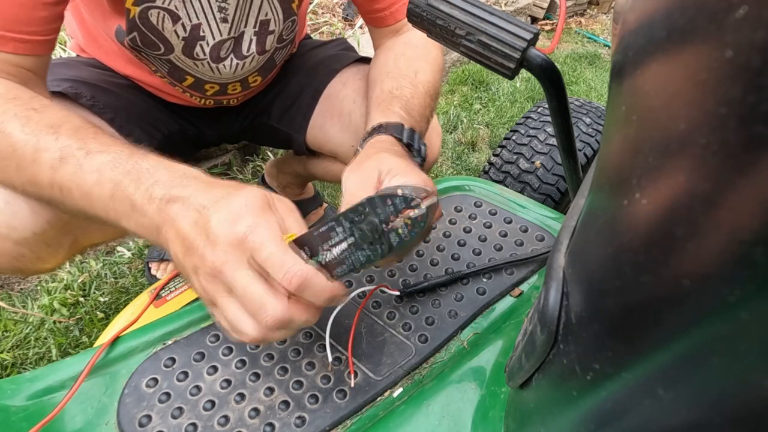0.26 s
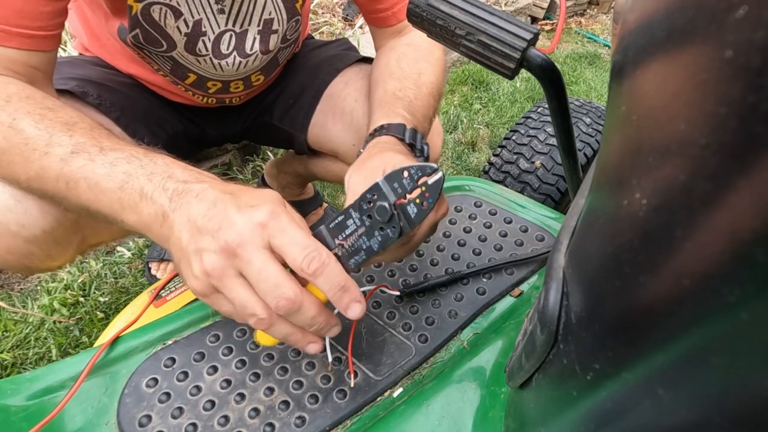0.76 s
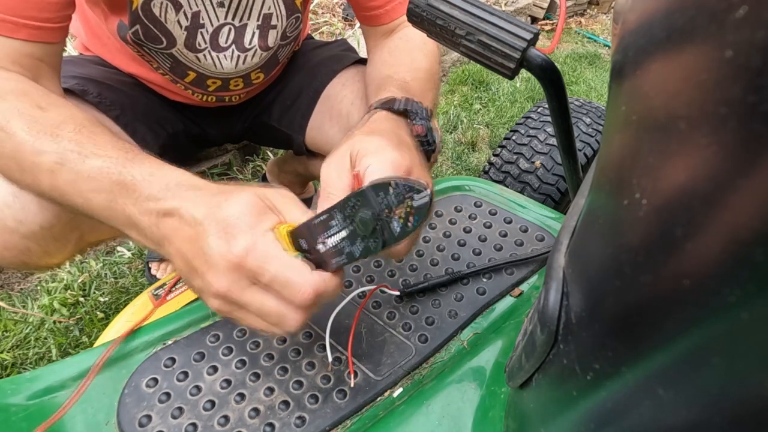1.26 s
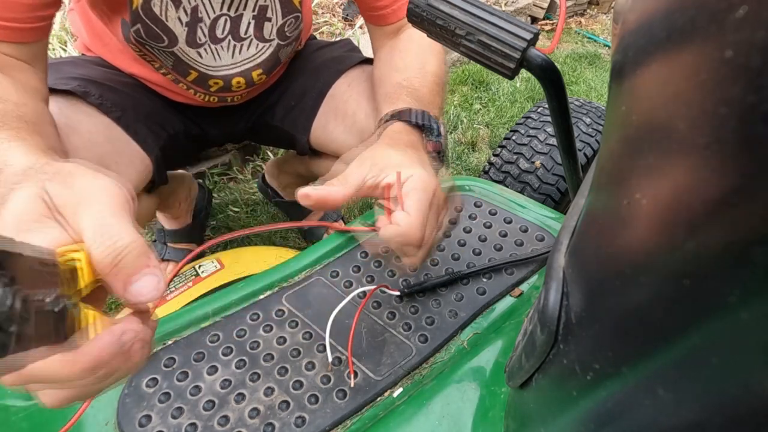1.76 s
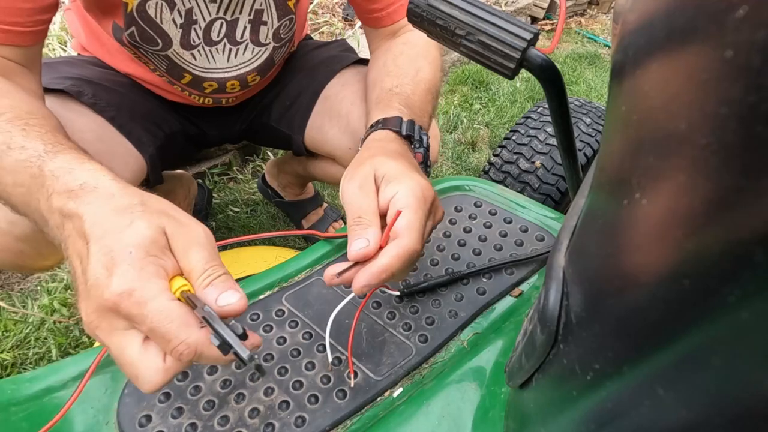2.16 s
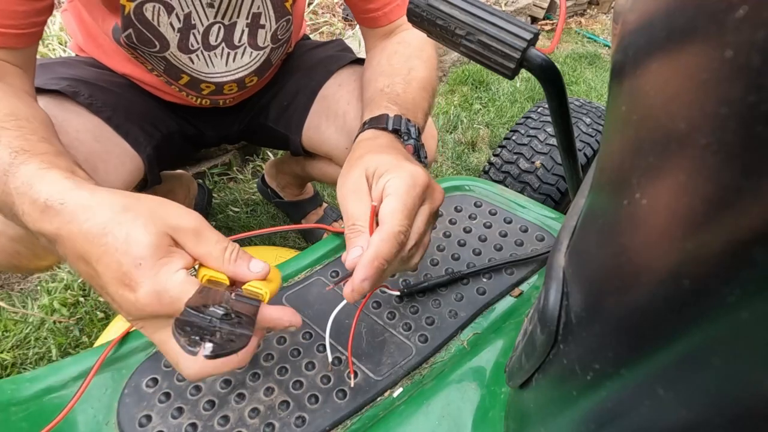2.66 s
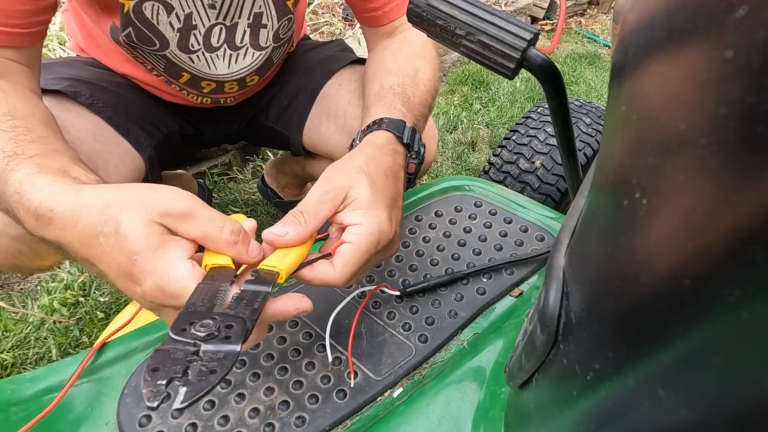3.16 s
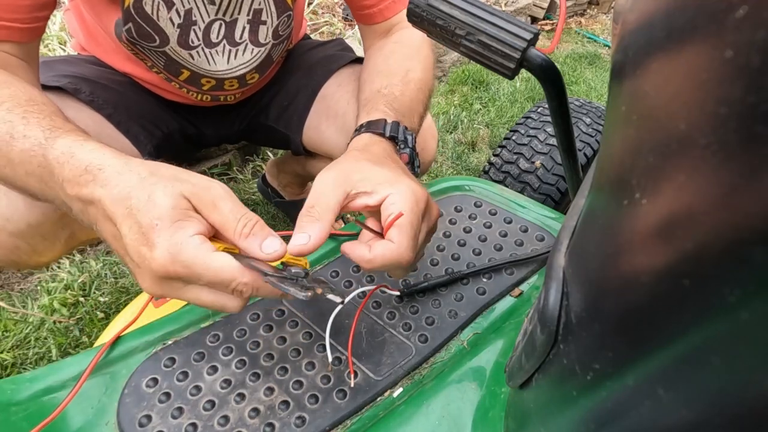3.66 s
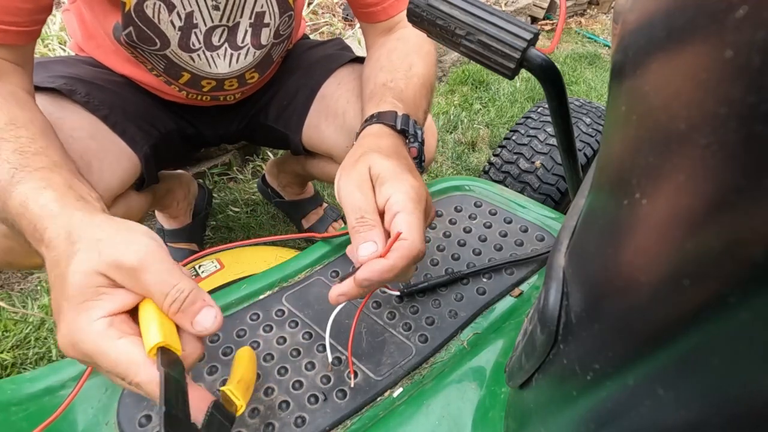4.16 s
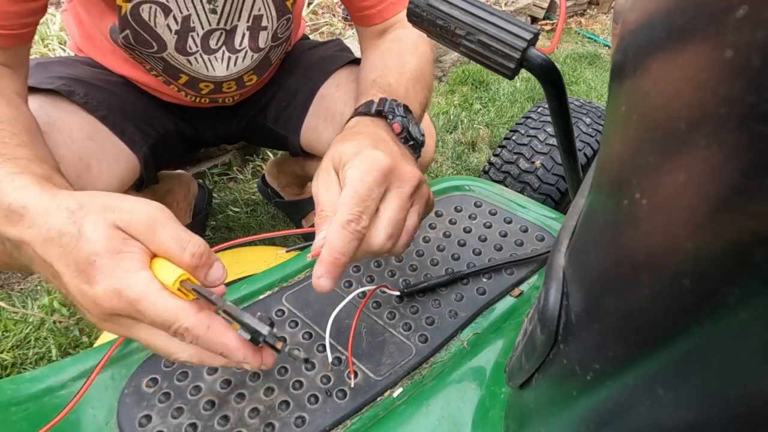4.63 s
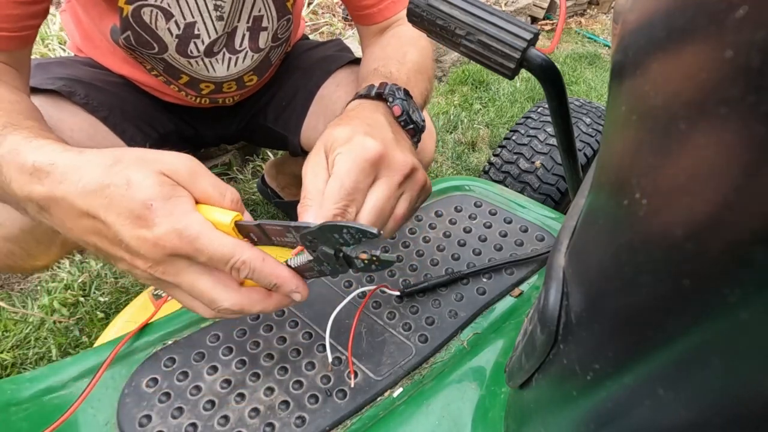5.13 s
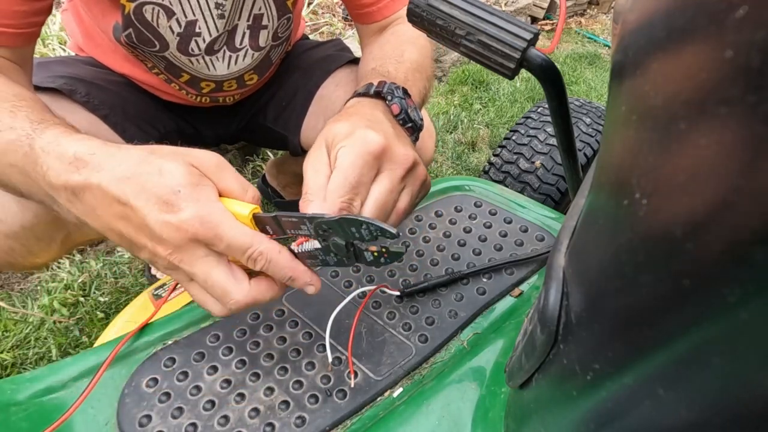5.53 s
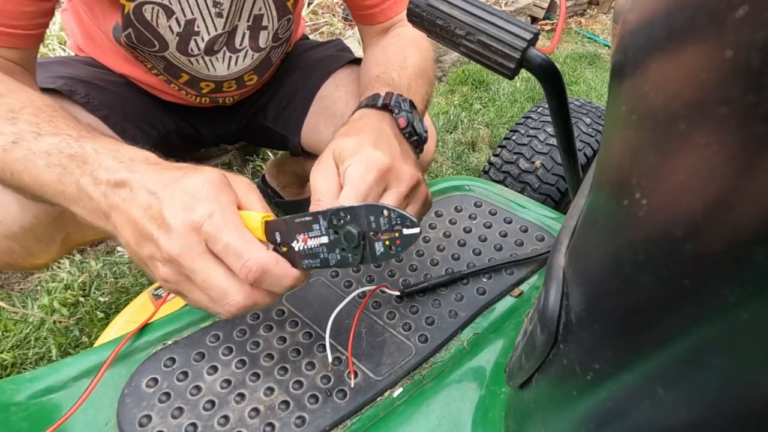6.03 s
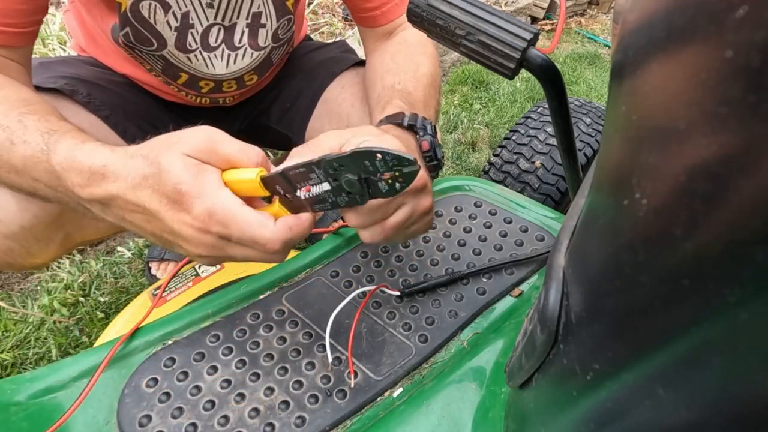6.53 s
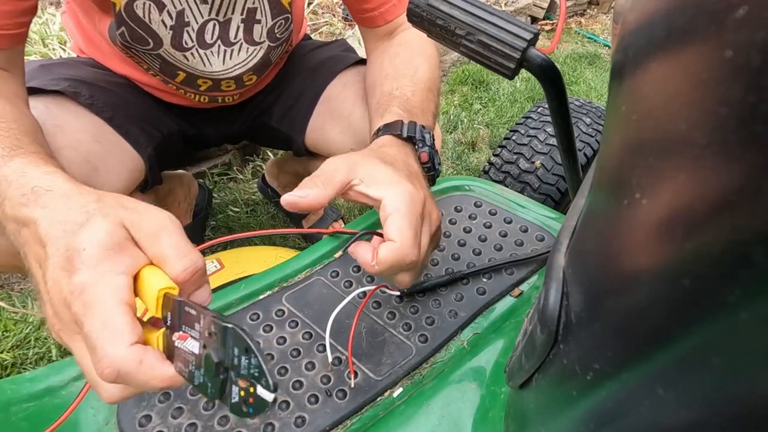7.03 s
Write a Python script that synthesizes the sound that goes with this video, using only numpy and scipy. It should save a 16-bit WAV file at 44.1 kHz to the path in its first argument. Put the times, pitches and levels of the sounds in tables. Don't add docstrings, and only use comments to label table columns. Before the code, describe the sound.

Close to the microphone, steel hand strippers click lightly, then snap hard in a quick cluster with short dry rings, brief scrapes and hollow knocks on a plastic deck. A middle stretch is mostly wind bumps and puffs, then two strong deck thuds, and finally a run of ticks and snaps. Behind, a low engine drone slowly climbs over traffic wash, with occasional faint bird whistles.

```python
import sys
import numpy as np
from scipy import signal
from scipy.fft import rfft, irfft
from scipy.io import wavfile
from scipy.ndimage import uniform_filter1d

SR = 44100
rng = np.random.default_rng(int(sys.argv[2]) if len(sys.argv) > 2 else 0)


def invert_db(level):
    return 10 ** (np.asarray(level, dtype=float) / 20)


def transcribe(signal):
    frames = np.atleast_2d(signal).T
    limited = np.clip(frames, -1, 1)
    pcm = np.round(limited * 32767).astype(np.int16)
    wavfile.write(sys.argv[1], SR, pcm)


N = 321489

# frequency in Hz, level in dB per Hz.
WASH_SPECTRUM = [(59, -29), (100, 2.5), (119, -17), (153, -20), (189, -16), (239, -27.5), (335, -34),
                 (433, -41), (721, -38), (854, -40.5), (930, -36), (2130, -47.5), (2580, -47), (6560, -53),
                 (7900, -59.5), (8300, -62.5), (12500, -72.5), (13600, -78.5), (15700, -84), (15900, -105)]
WASH_DB = -47.5
# centre in seconds, half width in seconds, level in dB.
WASH_SWELLS = [
    (0, 0.91, 0),
    (1.4, 0.48, 0.9),
    (3.5, 0.22, -4),
    (6.8, 0.11, 2),
]
# frequency in Hz, likeness from 0 to 1.
CHANNEL_LIKENESS = [(60, 0.98), (180, 1.0), (550, 0.88), (1650, 0.5), (4970, 0.7), (15000, 0.15)]
# frequency in Hz, left minus right in dB.
CHANNEL_LEAN = [(60, 0.47), (240, 0.38), (950, 1.7), (3770, 1.6), (15000, 2.0)]
# centre in seconds, half width in seconds, level in dB.
RUSTLES = [(1.5, 0.6, 5), (2.7, 0.51, 4.5), (3.55, 0.089, 2.5), (4.3, 0.52, 4.5), (1.23, .03, 6),
           (4.17, .03, 4.5), (4.39, .02, 4), (4.45, .025, 4), (5.6, .05, 2.5), (6.75, 0.18, -2.5),
           (6.95, 0.058, 4)]

# time in seconds, firing rate in Hz, firing tone level in dB.
ENGINE_RUN = [(0, 76.3, -42), (.3, 76.6, -35), (.73, 77.3, -25), (.95, 77.6, -23), (1.12, 78.8, -38),
              (1.32, 79.8, -21), (1.56, 80.3, -31.5), (1.76, 81, -22.5), (2.12, 82.4, -29),
              (2.4, 83.6, -27), (2.8, 85, -29.5), (3.1, 85.6, -32.5), (3.6, 87.4, -26), (4.3, 89.8, -30),
              (5.2, 90.9, -29.5), (5.6, 92, -25.5), (6.5, 92.3, -29.5), (7.29, 92.4, -30)]
# multiple of the firing rate, level over the firing tone in dB.
EXHAUST_ORDERS = [(.5, -14.5), (1.5, -33)]
# frequency in Hz, level in dB.
EXHAUST_PIPE = [(152, -43.5), (156, -37), (161, -36), (164, -40.5), (167, -32.5), (171, -40), (176, -47.5),
                (185, -48.5)]
OCTAVE_FOLLOWS = 0.33

# multiple of its rate, level in dB.
MOTOR_LINES = [(5, 3), (6, 0), (7, 0), (9.83, -4), (12, -9), (14.07, -9)]
MOTOR_HZ, MOTOR_DB, MOTOR_FADE_DB_PER_S = 54.6, -59, 3
MOTOR_ON_S, MOTOR_OFF_S, MOTOR_RISE_S = 0.68, 3.05, 0.13

# start in seconds, length in seconds, start pitch in Hz, glide in Hz, level in dB.
BIRD_NOTES = [(1.02, 0.028, 3300, 0, -46), (1.45, 0.05, 3400, -100, -49), (0.472, 0.02, 2680, -150, -52),
              (0.482, 0.034, 2440, -170, -48), (.512, .014, 2130, 38, -47), (.55, 0.027, 2110, 200, -53),
              (0.592, 0.068, 2260, 400, -55), (5.733, 0.022, 3470, -100, -51),
              (5.75, 0.02, 3370, -200, -40), (5.769, 0.012, 3200, 200, -39), (5.79, .011, 3200, 79, -50),
              (5.804, .011, 3330, 0, -49), (5.816, 0.017, 3200, 150, -44), (5.837, 0.01, 3330, -100, -44),
              (5.85, 0.024, 3240, 110, -47), (5.778, 0.025, 2320, -200, -53),
              (5.796, 0.034, 2200, -72, -48), (5.87, .025, 2670, -31, -50), (5.9, .017, 2220, 198, -46),
              (5.917, 0.03, 2270, 400, -53), (6.66, .035, 1240, 0, -44), (6.701, 0.038, 1290, 0, -39),
              (6.741, 0.032, 1280, 0, -40), (6.664, .02, 3400, 0, -49), (6.714, 0.018, 3400, 22, -43),
              (6.761, 0.013, 3450, 0, -43), (6.839, .04, 3450, -40, -46), (6.888, .055, 3480, -40, -50.5)]
BLUR_HZ, FLUTTER_DB = 40, 2.5

# centre in seconds, half width in seconds, level over the calm in dB.
GUSTS = [(1.06, 0.052, 2), (1.36, 0.43, 12.5), (2.12, 0.32, 16), (2.52, 0.074, 12), (3.05, 0.088, 29.5),
         (3.2, 0.05, 17), (3.48, 0.24, 16.5), (4.18, 0.042, 5), (4.5, 0.27, 17), (7.0, 0.12, 15),
         (7.25, 0.067, 13.5)]
WIND_DB = -46
# frequency in Hz, level in dB per Hz.
BUFFET_SPECTRUM = [(15, 16.5), (30, -17), (60, -4), (130, -9.5), (260, -17.5), (600, -41), (1000, -71),
                   (3000, -140)]
# crest in seconds, peak in dB, half width in seconds,
# left minus right in dB.
AIR_PUFFS = [(2.15, -13, 0.0021, 5), (2.418, -33, 0.0033, -2), (2.428, -18.5, 0.0025, 2),
             (2.461, -23, 0.0047, 4), (2.515, -31, 0.0086, -4), (2.533, -18, 0.0032, 5),
             (2.64, -28, .004, 4), (3.001, -24, .003, -3), (3.009, -15, 0.0036, -1),
             (3.028, -11, 0.0041, -3), (3.034, -10, 0.002, -9), (3.047, -12.5, 0.001, -12),
             (3.054, -19, 0.0014, -10), (3.073, -13, 0.0013, -12), (3.087, -23, 0.0099, -6),
             (3.144, -18, 0.0024, -4), (3.153, -14, 0.0028, 10), (3.168, -13, 0.0021, -6),
             (3.185, -16, 0.003, 9), (3.1905, -11, 0.0013, -9), (3.196, -25, 0.0017, -2),
             (3.208, -14.5, 0.0027, -3), (3.219, -27, 0.0036, -9), (3.247, -19, 0.0014, -4),
             (3.2505, -24, 0.0012, -14), (4.642, -22, .002, -2.5), (4.649, -26, .002, -5),
             (4.897, -30, 0.0028, -4), (4.924, -17.5, 0.0021, 0)]

# start in seconds, length in seconds, level in dB,
# start resonance in Hz, end resonance in Hz.
JAW_SCRAPES = [
    (1.67, .03, -58, 6000, 6000),
    (1.7, 0.067, -56.5, 4600, 4900),
    (1.702, 0.052, -48, 2300, 2090),
    (1.761, 0.032, -49, 2100, 2000),
    (6.503, 0.15, -65, 4730, 5000),
    (6.655, 0.068, -60, 4400, 4300),
    (6.74, .1, -64, 4570, 4270),
]
RUB_WIDTH_HZ = 740

# start in seconds, peak in dB, edge in dB, body in dB, body tilt in dB per octave.
DECK_KNOCKS = [(.006, -31, -3, 1, -8), (0.0355, -27.5, 1.5, -1.5, -5), (0.046, -40, -9, -6, 4),
               (0.053, -39.5, -5, -4, 4), (0.096, -47, -4, -6, 5), (0.1093, -44, 6.5, 4, -1),
               (0.116, -45.5, 9, 0.5, 3), (1.7566, -34.5, 6, -2, 0), (1.77, -39, 0, -13, 8),
               (1.8465, -44, -3, -8, 7), (4.1567, -24.5, -3, 7, 0), (4.382, -20.5, 1.5, 8.5, -1.5),
               (4.386, -26, -10, -0.5, 15), (4.399, -30.5, 1, -20, 5), (4.489, -42, -6, -9, 3),
               (4.657, -40.5, -17, -7, 11), (6.876, -46.5, 7.5, 2, 2.5)]
# frequency in Hz, level in dB, decay T60 in seconds.
DECK_MODES = [(151, -7.5, 0.087), (208, -1, 0.079), (231, -8, 0.46), (270, -8.5, 0.24), (339, -18, 0.45),
              (365, -1, 0.12), (442, 0, 0.059), (501, -13.5, 0.051), (570, -25, 0.066), (990, -26.5, 0.045),
              (1112, -8.5, 0.076), (1325, -11.5, 0.068), (1930, -31, 0.11), (2320, -38, 0.027)]
# frequency in Hz, level in dB, decay T60 in seconds.
DECK_CLATTER = [(464, -5.5, 0.1), (635, -7.5, 0.13), (1057, 1, 0.036), (1550, -10, 0.097),
                (2580, -6.5, 0.035), (8000, -10.5, 0.086)]
DECK_FREE, DECK_HELD, HELD_UNTIL_S = 0.94, 0.45, 4.2
CONTACT_S = .003
SHOVE_DB, SHOVE_HZ, SHOVE_T60_S = -5.5, 62.3, 0.22
THUD_DB, THUD_HZ, THUD_T60_S = -3.5, 185, .045

# start in seconds, peak in dB, strongest ring in Hz, brightness in dB, thump in dB.
BITES = [(1.1939, -32.5, 2870, -6.5, -54), (1.3931, -24, 4720, -10.5, -18), (1.3933, -26, 2400, -10, -13),
         (1.5963, -31.5, 2670, -12, -19), (1.65, -30.5, 2960, -48, -43), (1.6971, -20, 6300, -10.5, -5),
         (1.6992, -28, 3530, -20, -40), (1.7015, -27.5, 2800, -19, -40), (1.7175, -33.5, 4940, -9, -3),
         (1.7185, -37.5, 2090, -25, 1), (1.8476, -40.5, 4450, -4, 3.5), (3.989, -31.5, 2370, -3.5, -9),
         (6.0166, -38, 3050, 5.5, -9), (6.732, -42, 4500, -25, -20), (6.7372, -31, 4260, -18, -11),
         (6.78, -24, 4460, -29, -36), (6.8108, -34, 4000, -6, -20), (6.812, -30, 3830, -28, -9),
         (6.816, -31.5, 4100, -11, -8), (6.8201, -26, 6500, -8, -12), (6.8221, -30.5, 3700, -20, -10),
         (6.822, -34.5, 900, -30, 1)]
# start in seconds, peak in dB, strongest ring in Hz, brightness in dB.
LIGHT_TICKS = [(1.021, -52, 9500, 7), (1.0859, -46, 2340, -2), (1.543, -45, 6200, -13),
               (1.5724, -42, 3000, -30), (1.5795, -49, 2600, -26), (1.77, -56, 2820, 4),
               (1.806, -45.5, 2750, -7), (2.5, -52, 3270, -3), (4.0502, -45.5, 2920, -26),
               (6.03, -62, 2580, -16), (6.5288, -49, 2550, -20), (6.547, -56, 4370, -11),
               (6.567, -55, 4400, -15), (6.596, -44.5, 4330, -12), (6.6243, -41, 4400, -15),
               (6.6545, -41, 4130, -15), (6.7106, -47, 3600, -11), (4.995, -61, 4000, 0),
               (6.1614, -61, 4000, 3), (2.15, -54, 4000, 1.5), (2.28, -57, 4000, -2)]
# frequency in Hz, level in dB, decay T60 in seconds.
JAW_MODES = [(2400, -63, 0.0033), (3400, -25, 0.0079), (4450, 9, 0.026), (5300, -50, 0.0039),
             (7440, 1, 0.017)]
# time in seconds, left minus right in dB.
JAW_PAN = [(1.0, -1), (1.7, 0), (4.0, -0.5), (6.0, 0.5), (6.8, 0)]
TICK_THUMP_DB, BITE_RISE_S = -8, 0.00059
RING_LENGTH, GRIP_PER_DB = 1, 0.63
BITE_DB, BITE_FOCUS_DB = -6, 6
TREBLE_LEAN, TREBLE_HZ = 0.24, 8000


def evened(x):
    return x / np.sqrt(np.mean(x ** 2) + 1e-20)


def peaked(x, db):
    return invert_db(db) * x / np.sqrt(uniform_filter1d(x ** 2, 176).max(-1, keepdims=True))


def read(points, hz):
    f, value = np.transpose(points)
    return np.interp(np.log(hz + 1), np.log(f + 1), value)


def curves(rows, t):
    s, *columns = np.transpose(rows)
    return [np.interp(t, s, c) for c in columns]


def swells(rows, t):
    return sum(db * np.exp(-((t - s) / width) ** 2) for s, width, db in rows)


def add(mix, s, sound, pan_db):
    part = mix[:, round(s * SR):][:, :len(sound)]
    part += invert_db([[pan_db / 2], [-pan_db / 2]]) * sound[:part.shape[1]]


def band(x, lo_hz, hi_hz):
    sos = signal.butter(2, [lo_hz, min(hi_hz, SR / 2.2)], "band", fs=SR, output="sos")
    return signal.sosfilt(sos, x)


def tone(hz, t):
    return np.sin(2 * np.pi * hz * t)


def wander(top_hz):
    t = np.arange(0, N + 256, 256) / SR
    rates_hz = np.geomspace(top_hz / 20, top_hz, 20)
    slow = sum(np.sin(2 * np.pi * (f * t + rng.random())) / np.sqrt(f) for f in rates_hz)
    return np.interp(np.arange(N) / SR, t, evened(slow))


def noise(colour_db, same, patchy_db):
    frames, hz = N // 256 + 5, np.fft.rfftfreq(1024, 1 / SR)
    a, b, c, d, patches = rng.standard_normal((frames, 513, 5)).T
    patches = evened(uniform_filter1d(uniform_filter1d(patches, 10, 0), 12, 1))
    like = np.clip(same(hz), -1, 1)[:, None]
    left = a + 1j * b
    right = like * left + np.sqrt(1 - like ** 2) * (c + 1j * d)
    level_db = colour_db(np.arange(frames) * 256 / SR, hz[:, None]) + patchy_db * patches
    z = np.array([left, right]) * invert_db(level_db)
    lean = invert_db(read(CHANNEL_LEAN, hz)[:, None] / 2)
    return signal.istft(z * [lean, 1 / lean], nperseg=1024, noverlap=768)[1][:, :N]


def crackle(edges_hz, t60, level_db, rise_s, size):
    t, out = np.arange(size) / SR, 0
    for lo, hi in zip(edges_hz, edges_hz[1:]):
        fading = invert_db(-60 * t / t60(lo)[:, None]) * np.minimum(t / rise_s, 1)
        burst = band(rng.standard_normal(fading.shape) * fading, lo, hi)
        burst = band(burst, lo / 1.25, 1.25 * hi)
        out = out + peaked(burst, level_db(lo)[:, None])
    return out


def ringing(modes, spread, length, scrape_s, count, size):
    t = np.arange(size) / SR
    blow = rng.standard_normal(600) * np.exp(-t[:600] / scrape_s)
    hz, db, t60 = np.repeat(modes, count, axis=0).T[:, :, None]
    uneven, detune = rng.standard_normal((2, len(hz), 1))
    fading = invert_db(db + 2 * uneven - 60 * t / (t60 * length))
    ring = (fading * tone(hz * (1 + spread * detune), t)).sum(0)
    return signal.fftconvolve(blow / np.linalg.norm(blow), ring)[:size]


def wash(turns):
    def colour_db(t, hz):
        swell_db = swells(WASH_SWELLS, t) / (1 + (hz / 2500) ** 2)
        rustle_db = swells(RUSTLES, t) / (1 + (7500 / (hz + 1)) ** 6)
        return read(WASH_SPECTRUM, hz) + swell_db + rustle_db
    roar = noise(colour_db, lambda hz: read(CHANNEL_LIKENESS, hz), patchy_db=1.08)
    throb = 1 + 0.036 * np.cos(np.pi * turns) + 0.03 * np.cos(2 * np.pi * turns)
    return invert_db(WASH_DB) * roar / np.std(band(roar, 299.0, 16000)) * throb


def birds():
    mix = np.zeros((2, N))
    for s, length, from_hz, glide_hz, db in BIRD_NOTES:
        count = round(length * SR)
        blur = evened(uniform_filter1d(rng.standard_normal(8000), 150))[:count]
        flutter = evened(uniform_filter1d(rng.standard_normal(8000), 200))[:count]
        hz = np.linspace(from_hz, from_hz + glide_hz, count) + BLUR_HZ * blur
        whistle = np.sin(2 * np.pi * np.cumsum(hz) / SR) * signal.windows.tukey(count, .5)
        add(mix, s, invert_db(db - 8.5 + FLUTTER_DB * flutter) * whistle, 0)
    return mix


def motor():
    t = np.arange(N) / SR
    turns = np.cumsum(MOTOR_HZ * (1 + 0.0028 * wander(14))) / SR
    lines = sum(invert_db(db + 2.5 * wander(9)) * np.sin(2 * np.pi * (k * turns + rng.random()))
                for k, db in MOTOR_LINES)
    level_db = MOTOR_DB - MOTOR_FADE_DB_PER_S * (t - MOTOR_ON_S)
    level_db -= 7 * (1 - np.tanh((t - MOTOR_ON_S) / MOTOR_RISE_S))
    level_db -= 8 * (1 + np.tanh((t - MOTOR_OFF_S) / MOTOR_RISE_S))
    return invert_db(level_db + 4.5) * lines


def engine():
    hz, tone_db = curves(ENGINE_RUN, np.arange(N) / SR)
    octave_db = read(EXHAUST_PIPE, 2 * hz) + OCTAVE_FOLLOWS * (tone_db + 27.0)
    turns = np.cumsum(hz * (1 + 0.005 * wander(12))) / SR
    drone = invert_db(tone_db + 0.25 * wander(25)) * np.sin(2 * np.pi * turns)
    drone += invert_db(octave_db + 1.03 * wander(22)) * np.sin(2 * np.pi * (2 * turns + 0.17))
    for order, db in EXHAUST_ORDERS:
        wavering = invert_db(tone_db + db + 4.4 * wander(8.8))
        drone += wavering * np.sin(2 * np.pi * (order * turns + rng.random()))
    return np.sqrt(2) * drone, turns


def shove(db, width):
    t = np.arange(-1 / 20, 1 / 20, 1 / SR)
    return invert_db(db) / (1 + (t / width) ** 2) * np.hanning(len(t))


def wind():
    buffet = noise(lambda t, hz: read(BUFFET_SPECTRUM, hz) + 0 * t, lambda hz: 0.76 + 0 * hz, patchy_db=2.0)
    level_db = WIND_DB + swells(GUSTS, np.arange(N) / SR) + [[-1.5], [1.5]]
    mix = invert_db(level_db) * buffet / np.std(band(buffet, 9.4, 76))
    for k, (s, db, width, pan_db) in enumerate(AIR_PUFFS):
        add(mix, s - 1 / 20, -(-1) ** k * shove(db, width), pan_db)
    return mix


def surroundings(x):
    t = np.arange(4096) / SR
    hits = rng.standard_normal((2, 4096)) * (rng.random((2, 4096)) < .3)
    spectrum = rfft(hits * invert_db(-60 * t / .045) * (t > .0015))
    taps = irfft(spectrum / np.sqrt(uniform_filter1d(abs(spectrum) ** 2, size=25, axis=1)))
    return signal.fftconvolve(x, taps / np.linalg.norm(taps[0]), axes=1)[:, :N]


def scrapes():
    mix = np.zeros((2, N))
    smooth = signal.butter(2, RUB_WIDTH_HZ / 2, fs=SR, output="sos")
    for s, length, db, from_hz, to_hz in JAW_SCRAPES:
        count = round(length * SR)
        slips = (rng.standard_normal(SR) ** 2 * rng.choice([-1, 0, 0, 0, 1], SR))[:count]
        turn = np.exp(2j * np.pi * np.cumsum(np.linspace(from_hz, to_hz, count)) / SR)
        rubbed = (turn * signal.sosfilt(smooth, slips / turn)).real
        add(mix, s, invert_db(db) * evened(band(rubbed, 1100, 5400)) * signal.windows.tukey(count, .7), 0)
    return mix


def knocks():
    mix = np.zeros((2, N))
    s, db, edge_db, body_db, tilt_db = np.transpose(DECK_KNOCKS)[:, :, None]
    length, t = np.where(s < HELD_UNTIL_S, DECK_HELD, DECK_FREE), np.arange(11000) / SR
    low = 0
    for hz, mode_db, t60 in DECK_MODES:
        place_db = tilt_db * np.log2(hz / 300)
        fading = invert_db(mode_db + place_db - 60 * t / (t60 * length))
        low = low + fading * tone(hz * (1 + 0.0084 * rng.standard_normal(s.shape)), t)
    low = band(-low * np.minimum(t / CONTACT_S, 1), 98, 4400)
    rock = invert_db(db + body_db + SHOVE_DB - 60 * t / SHOVE_T60_S) * tone(SHOVE_HZ, t)
    rock -= invert_db(db + body_db + THUD_DB - 60 * t / THUD_T60_S) * tone(THUD_HZ, t)
    modes_hz, modes_db, modes_t60 = np.transpose(DECK_CLATTER)

    def t60_s(lo):
        return np.interp(lo, modes_hz, modes_t60) * length[:, 0]

    def level_db(lo):
        soft, height = edge_db[:, 0], np.log2(lo / 1300)
        hard_db = 1.14 * soft * np.clip(height / 0.76, 0, 1) - 13.0 * max(height - .7, 0)
        return db[:, 0] - 6.0 + hard_db + np.interp(lo, modes_hz, modes_db)
    clatter = crackle(np.geomspace(400, 13000, 14), t60_s, level_db, rise_s=0.00018, size=11000)
    for start, sound in zip(s[:, 0], peaked(low, db + body_db) + rock + clatter):
        add(mix, start, sound, pan_db=-1.5)
    return mix


def strippers():
    mix = np.zeros((2, N))
    events = BITES + [(*row, TICK_THUMP_DB) for row in LIGHT_TICKS]
    s, db, hz, bright_db, thump_db = np.transpose(events)
    length = np.clip(RING_LENGTH - GRIP_PER_DB * (db + 39.5), .45, 1.1)
    jaws = np.array([ringing(JAW_MODES, .04, k, scrape_s=0.00067, count=2, size=2000) for k in length])
    notch = np.array([ringing([(f, 0, .011)], .005, np.sqrt(k), scrape_s=.0018, count=1, size=2000)
                      for f, k in zip(hz, length)])

    def t60_s(lo):
        return .015 * length * (3000 / lo) ** .2

    def outline_db(lo, f, top, low):
        points = [(700, low), (1300, 0.16 * low - 10.0), (0.44 * f + 1200, -3),
                  (6500, 0.25 * top - 5.0), (9000, top), (14000, top - 14)]
        return read(points, lo)

    def level_db(lo):
        focus_db = BITE_FOCUS_DB * np.exp(-(2 * np.log2(1.15 * lo / hz)) ** 2)
        outlines = [outline_db(lo, *row) for row in zip(hz, bright_db, np.minimum(thump_db, 1))]
        return db - 11.0 + focus_db + np.array(outlines)
    crack = crackle(np.geomspace(500, 16000, 13), t60_s, level_db, BITE_RISE_S, size=2000)
    rings = peaked(jaws, db[:, None] - 9.5) + peaked(notch, db[:, None] + BITE_DB)
    for start, sound in zip(s, band(rings, 1200, 13000) + crack):
        add(mix, start, sound, curves(JAW_PAN, start)[0])
    mix[0] += TREBLE_LEAN * band(mix[0], TREBLE_HZ, 17000)
    lag = .3
    return np.array([signal.lfilter([lag, 1], [1, lag], mix[0]), mix[1]])


def scene():
    drone, turns = engine()
    near = strippers() + knocks() + scrapes()
    far = drone + motor() + wash(turns) + wind() + birds()
    return near + invert_db(-10.5) * surroundings(near) + far


def top_cut(x):
    return signal.sosfilt(signal.butter(12, 16410, fs=SR, output="sos"), x)


def record(dry):
    dulled = signal.sosfilt(signal.butter(4, 14000, fs=SR, output="sos"), dry)
    dulled *= np.minimum(np.arange(N, 0, -1) / 150 + .3, 1)
    return top_cut(dulled)


dry = scene()
out = record(dry)
transcribe(out)
```